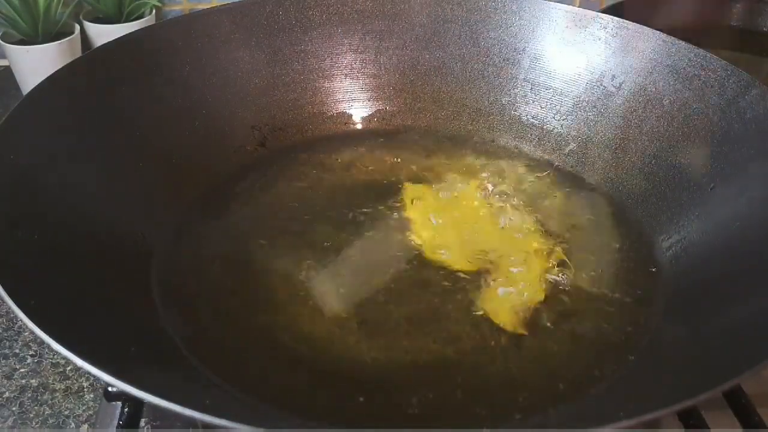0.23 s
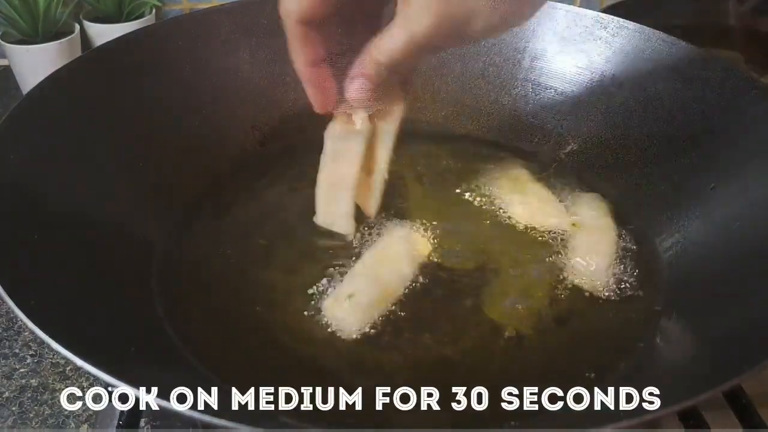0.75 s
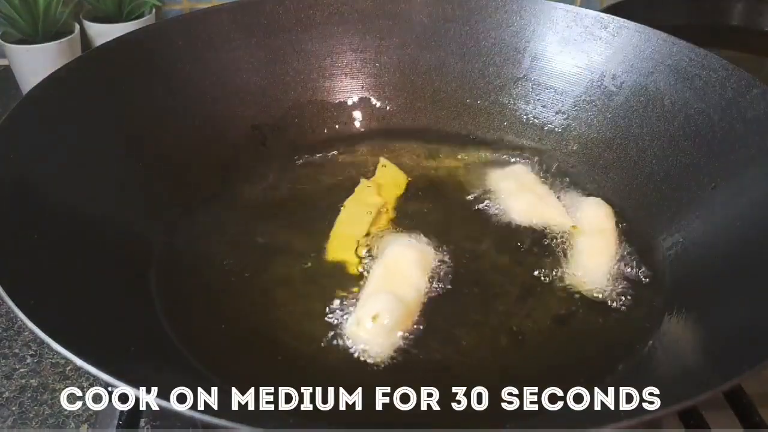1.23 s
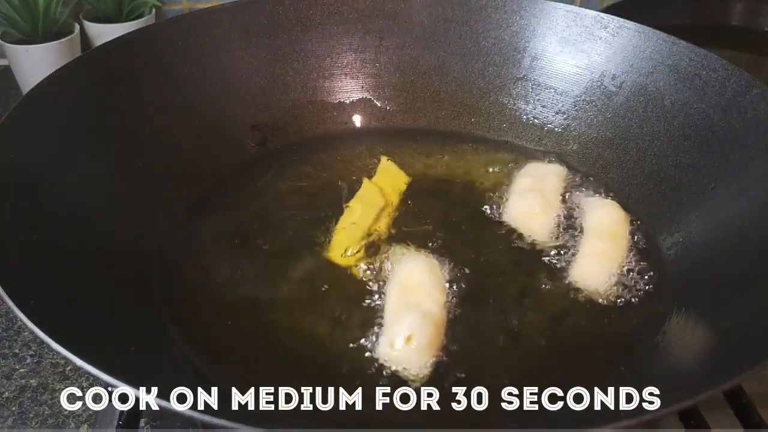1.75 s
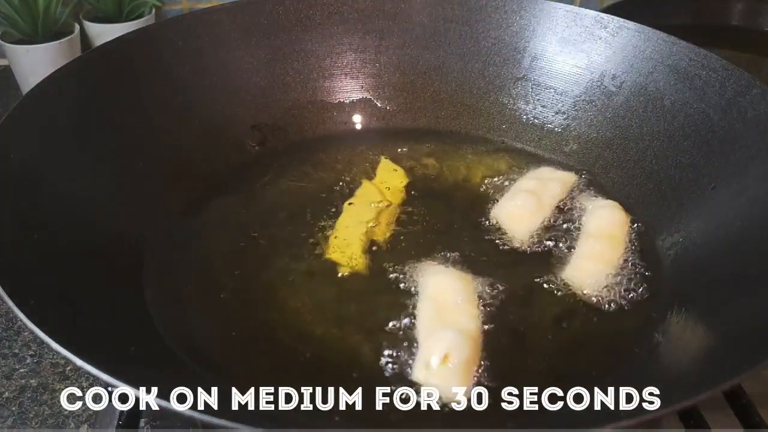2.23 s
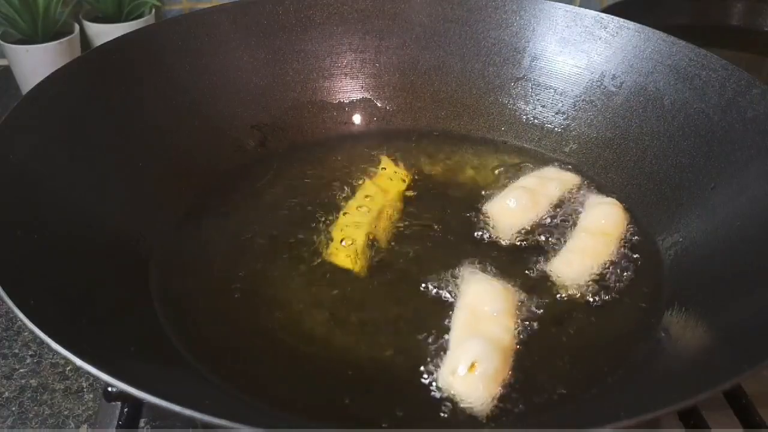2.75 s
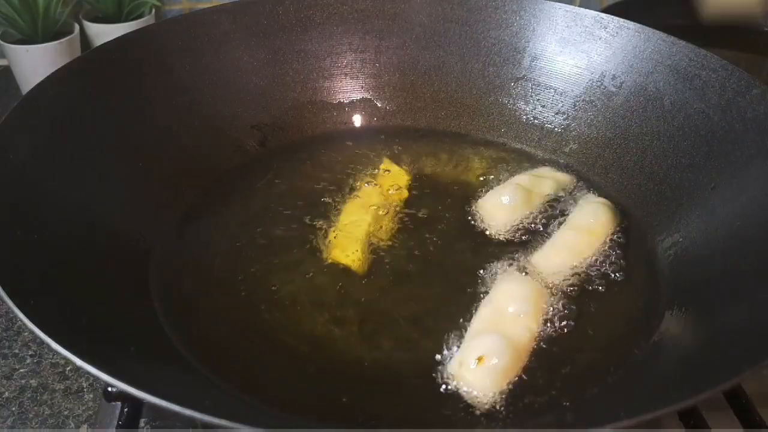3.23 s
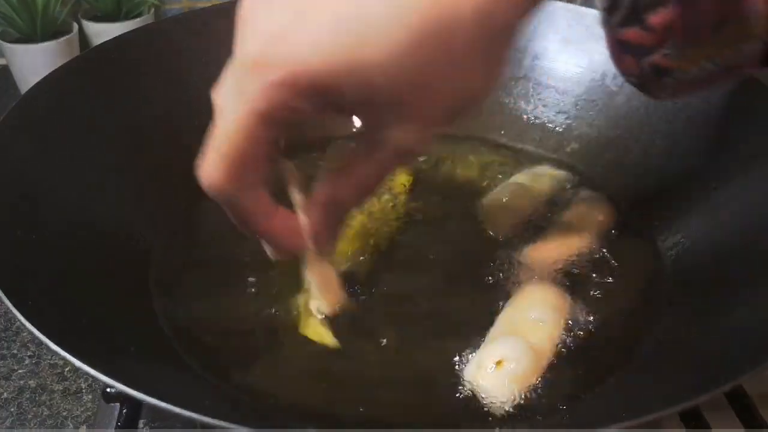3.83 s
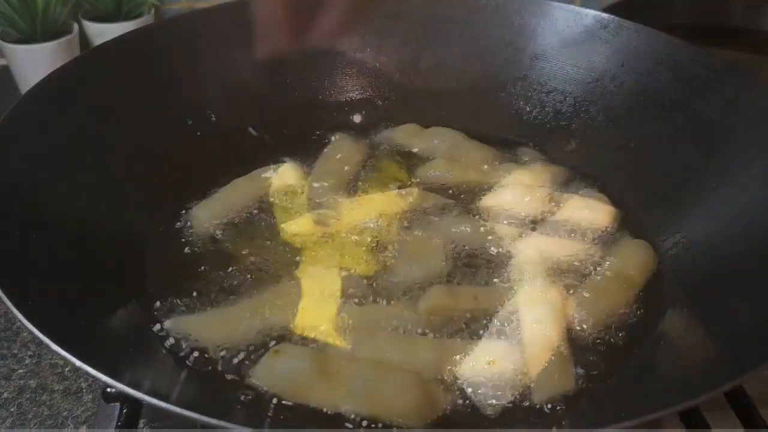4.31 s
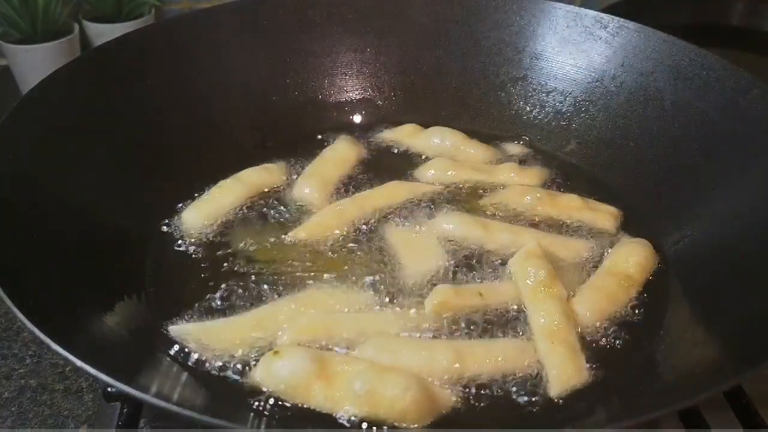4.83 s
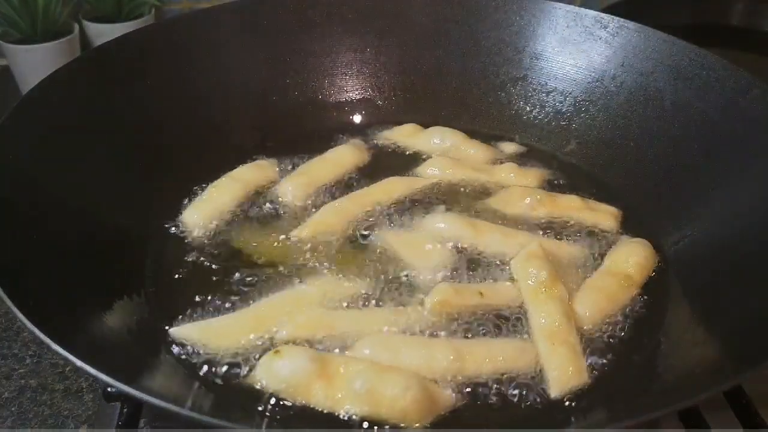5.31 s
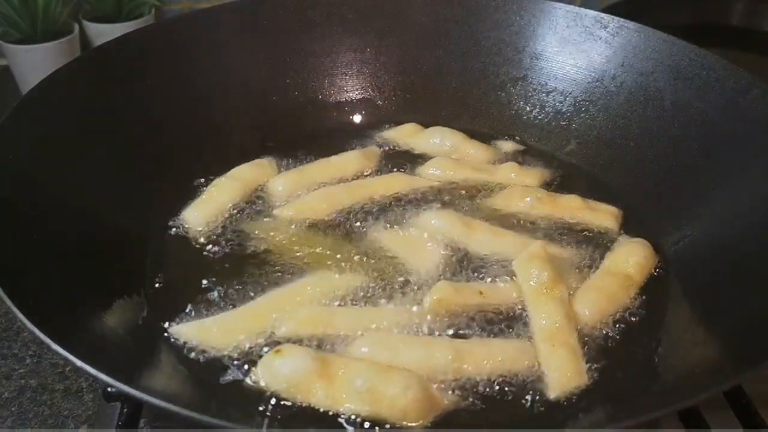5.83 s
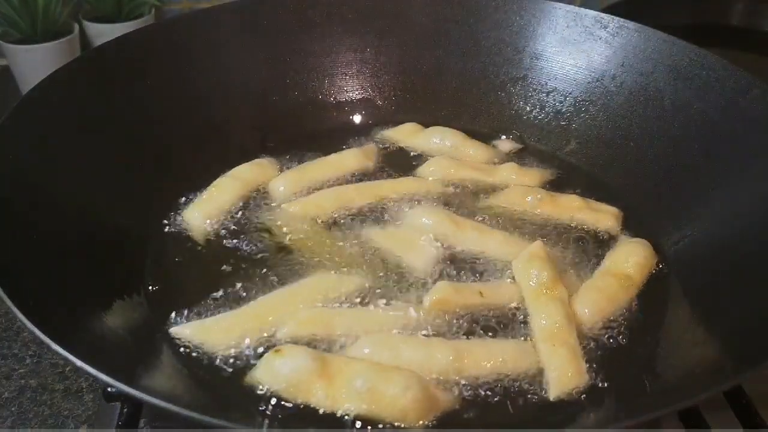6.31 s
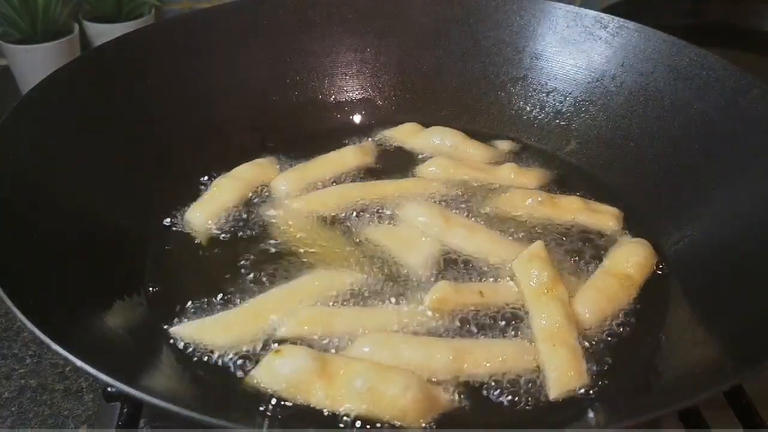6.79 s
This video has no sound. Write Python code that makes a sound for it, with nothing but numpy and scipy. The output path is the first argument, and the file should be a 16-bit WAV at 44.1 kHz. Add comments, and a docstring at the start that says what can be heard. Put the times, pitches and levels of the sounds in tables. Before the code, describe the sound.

A high, rapid twitter is already under way on the left and soon fades. A finch on the right gives two sharp metallic pink calls, then another pair later. Faint birds whistle and warble behind. On the left a singer drops through two-note steps into a rattling, slurred flourish. Echoing woodland, wide stereo, steady soft rush with an early leafy rustle.

```python
"""In an echoing wood, songbirds call over the steady rush of distant wind or water.
A finch close on the right gives sharp double 'pink' calls; on the left one bird twitters high, then another
sings a falling song with a closing flourish. Fainter birds whistle and warble among the trees.
Each voice is a frequency-modulated tone with weak harmonics, heard directly and as scatter from trunks;
the rush, the rustle and the hiss are filtered noise."""
import sys
import numpy as np
from scipy import signal
from scipy.fft import rfft, irfft, next_fast_len
from scipy.io import wavfile
from scipy.ndimage import uniform_filter1d, map_coordinates

SR = 44100
rng = np.random.default_rng(int(sys.argv[2]) if len(sys.argv) > 2 else 0)


def bounce(signal):
    """Save signal as a 16-bit WAV file at the path given by the first command-line argument."""
    frames = np.transpose(np.atleast_2d(signal))
    limited = np.clip(frames, -1, 1)
    pcm = np.round(limited * 32767).astype(np.int16)
    wavfile.write(sys.argv[1], SR, pcm)


N = 311346  # length in samples


def finch():
    """Two-voiced phonation: each call sweeps up harshly, with sidebands, into a loud pure top."""
    # Each row: top of the upsweep in seconds, top pitch in Hz, relative level in dB, hold of the top in
    # seconds, sag at the end as a share of pitch.
    calls = [(1.329, 4280, -20, 0.037, 0.0077), (1.549, 4400, -20, 0.025, 0.0096),
             (2.902, 4174, -22, 0.043, 0.024), (3.156, 4313, -20.5, .038, 0.086),
             (7.072, 4200, -26, 0.03, .02)]
    # The upsweep. Each row: time from the top in seconds, pitch ratio, relative level in dB.
    upsweep_shape = [(-.034, .54, -32), (-.02, .71, -19), (-.008, .83, -14), (0, .97, -2), (.006, .995, 1),
                     (.016, 1, 0)]
    # The other side of the syrinx, briefly above the upsweep. Each row: time from the top in seconds,
    # pitch ratio, relative level in dB.
    second_voice = [(-.044, 0.78, -30), (-.033, .84, -24.5), (-.023, .95, -27), (-.016, 1.06, -20.5)]
    release_s = 0.0074
    track = np.zeros(N)
    for s, hz, db, hold, sag in calls:
        upsweep = [(s + dt, hz * ratio, db + level) for dt, ratio, level in upsweep_shape]
        end_hz = hz * (1 - sag)
        top = [(s + .7 * hold, hz * (1 - sag / 4), db - 1),
               (s + hold, end_hz, db - 2),
               (s + hold + release_s, end_hz, db - 13)]
        add(track, *syrinx(upsweep + top, waver=0.0038, overtone_db=-8))
        # the two sides of the syrinx beat, throwing sidebands above the second voice
        for sideband, side_db in [(1, 6.5), (1.27, 2.5), (1.56, -5)]:
            edge = [(s + dt, hz * ratio * sideband, db + level + side_db) for dt, ratio, level in second_voice]
            add(track, *syrinx(edge, waver=0.046))
    reflections = near_trunks(track, db=-13.5, spread=0.064) * amp([[-5], [0]])
    return reflections + outdoors(track, direct_db=-7.0, pan_db=-16.5,
                                  echo_db=-12.0, echo_pan_db=-1.0, build=0.014)


def twitterer():
    """Directivity: as the bird turns its head the straight sound jumps in level; the wood fills evenly."""
    # How squarely the bird faces the listener. Each row: time in seconds, gain of the straight sound in dB
    # before panning.
    facing_curve = [(-.1, -37.5), (.07, -39.5), (.14, -41), (.23, -48), (.38, -51), (.46, -44.5),
                    (.54, -45.5), (.72, -56)]
    start_s, gap_s, drag_s, count = -.166, .0772, .045, 14  # the pace drags towards the end of the run
    base_hz, climb_hz_per_s, plunge_db = 6290, 860, -7
    lead_s = .25  # room for the part of the run that is under way before the scene opens
    k = np.arange(count)
    times = start_s + gap_s * k + drag_s * (k / k[-1]) ** 4
    crests = (base_hz + climb_hz_per_s * times) * (1 + .015 * rng.standard_normal(len(k)))
    syllables = np.array([twitter_syllable(s + lead_s, hz, plunge_db) for s, hz in zip(times, crests)])
    facing = amp(np.interp(times, *np.transpose(facing_curve)))
    straight = (facing @ syllables) * amp([[5], [-7]])
    # the foliage swallows the highest pitches
    scattered = filtered(syllables.sum(0), lambda hz: amp(along([(4700, -0.3), (6500, -5)], hz)))
    echo = wood_echo(scattered, build=0.0076) * amp([[-36], [-39]])
    # take the lead off the front and silence what wraps round to the end
    return np.roll(straight + echo, -round(lead_s * SR), axis=1) * (np.arange(N) < N - lead_s * SR)


def twitter_syllable(s, hz, plunge_db):
    """Superposed frequency sweeps: a zigzag, a lower pip under its crest and a plunge at its end."""
    # Each row: time from the crest in seconds, pitch ratio, level in dB before the paths to the listener.
    zigzag_shape = [(-.018, .87, -9), (-.01, .92, -2), (-.004, .96, -1), (0, 1, -3), (.005, .82, -2),
                    (.009, .88, -2), (.014, .68, -7)]
    zigzag = [(s + dt, hz * ratio, level) for dt, ratio, level in zigzag_shape]
    pip = [(s - .006, 4300, -6), (s, 4800, -1), (s + .005, 4450, -5)]
    plunge = [(s + .011, 5200, plunge_db), (s + .017, 3100, plunge_db - 6), (s + .026, 1800, plunge_db - 12)]
    track = np.zeros(N)
    add(track, *syrinx(zigzag, waver=.017))
    add(track, *syrinx(pip, waver=.04))
    add(track, *syrinx(plunge, waver=.012))
    return track


def singer():
    """Direct sound, early reflections and reverberation carry a stepwise falling song and its flourish."""
    track = steps() + flourish()
    reflections = near_trunks(track, db=-7, spread=0.08) * amp([[2], [-6]])
    return reflections + outdoors(track, direct_db=-12.5, pan_db=22.5,
                                  echo_db=-2, echo_pan_db=1.5, build=0.014)


def steps():
    """A fixed frequency ratio: each held upper note leaps down by one interval; buzzes lead in."""
    # The two-note syllables. Each row: time of the drop in seconds, upper pitch in Hz, relative level in
    # dB, hold of each note in seconds.
    leaps = [(4.104, 5450, -46, 0.031), (4.300, 4842, -43.5, 0.035), (4.495, 4840, -41, 0.033),
             (4.684, 4546, -37, 0.031), (4.871, 4063, -35.5, 0.017), (5.042, 3830, -37, 0.018)]
    # Buzzes ahead of syllables and of the closing cascade. Each row: start in seconds, length in seconds,
    # centre pitch in Hz, relative level in dB.
    buzzes = [(3.972, 0.04, 5520, -60), (4.23, .06, 6060, -62), (4.416, .045, 6170, -57.5),
              (4.615, 0.037, 5690, -53.5), (4.793, 0.078, 4870, -46), (5.699, 0.068, 5830, -55.5)]
    step_ratio = .742  # lower note over upper note
    track = np.zeros(N)
    for row in buzzes:
        add(track, *glide(*row, fall=0, waver=.06))
    for s, upper, db, hold in leaps:
        lower = upper * step_ratio
        upper_db, lower_db = db + throat(upper), db + throat(lower)
        high = [(s - hold - .006, upper * .94, upper_db - 5),
                (s - hold, upper, upper_db),
                (s, upper * .99, upper_db - 4)]
        # the voice thins as it leaps down
        drop = [(s + .009, (upper + lower) / 2 * .95, lower_db - 6)]
        low = [(s + .018, lower * .88, lower_db - 5),
               (s + .027, lower, lower_db),
               (s + .027 + hold, lower * .995, lower_db - 4)]
        add(track, *syrinx(high + drop + low, waver=.017))
    return track


def flourish():
    """Rapid repetition: rattles of falling strokes among rising slurs, then a cascade of rattles."""
    # Runs of quick strokes. Each row: start in seconds, nominal length in seconds, first and last pitch in
    # Hz before scatter, relative level in dB.
    rattles = [(5.043, .06, 3180, 2787, -37), (5.139, .03, 3810, 2920, -42),
               (5.312, .045, 4910, 3230, -34.5), (5.487, .045, 4910, 3210, -36.5),
               (5.765, .03, 4620, 4370, -40.5), (5.797, .06, 4180, 3380, -36.5),
               (5.863, .045, 3500, 2734, -34), (5.916, .03, 2600, 2360, -34)]
    # Scoops up from a low note. Each row: time of the top in seconds, relative level in dB.
    slurs = [(5.226, -35.5), (5.402, -33.5), (5.585, -35)]
    # One slur. Each row: time from the top in seconds, pitch in Hz, relative level in dB.
    slur_shape = [(-.05, 2336, 0), (-.035, 2209, 0), (-.016, 2723, -4.5), (0, 3300, 0.5), (.013, 3420, -10)]
    gap_s, stroke_s, stroke_fall = .0152, 0.01584, 0.114  # slide either side of the centre, share of pitch
    swell_db = 5  # depth of the swell towards the middle of a rattle
    scatter, scatter_db = 0.0286, 1.5  # chance from stroke to stroke: share of pitch, level
    track = np.zeros(N)
    for s, length, first, last, db in rattles:
        count = max(2, round(length / gap_s))
        chance = rng.standard_normal((count, 2))
        pitches = np.linspace(first, last, count) * (1 + scatter * chance[:, 0])
        for k, hz in enumerate(pitches):
            swell = swell_db * (np.sin(np.pi * (k + .5) / count) - 1)
            stroke_db = db + swell + scatter_db * chance[k, 1] + throat(hz)
            add(track, *glide(s + k * gap_s, stroke_s, hz, stroke_db, stroke_fall, waver=.035))
    for s, db in slurs:
        slur = [(s + dt, hz, db + level + throat(hz)) for dt, hz, level in slur_shape]
        add(track, *syrinx(slur, waver=.05))
    return track


def throat(hz):
    """Resonance: the singer's gain in dB peaks at one pitch and falls with the squared distance in octaves."""
    best_hz, octave_loss_db = 3620, 24
    return -octave_loss_db * np.log2(hz / best_hz) ** 2


def far_birds():
    """Direct-to-reverberant ratio: distant whistles are mostly echo; a closer warble is blurred by trunks."""
    # Thin whistles. Each row: start in seconds, length in seconds, pitch in Hz, relative level in dB.
    whistle_notes = [(1.775, 0.069, 5280, -57), (2.464, .17, 4540, -55), (2.529, 0.034, 4240, -49.5),
                     (2.624, 0.12, 3805, -54.5), (2.747, 0.062, 4280, -53), (3.477, 0.15, 4430, -58.5),
                     (6.279, 0.16, 4327, -59), (6.551, .4, 4396, -64.5)]
    # Soft, low slurred notes and chips. Each row: start in seconds, length in seconds, middle pitch in Hz,
    # relative level in dB, slide either side of the middle as a share of pitch (positive falls).
    warble_notes = [(.825, 0.028, 1253, -45.5, 0.082), (.905, 0.088, 2510, -47.5, -0.048),
                    (1.02, 0.044, 2795, -48, .15), (1.10, .08, 2580, -50.5, 0.086),
                    (1.712, 0.053, 2520, -49, -0.047), (1.905, 0.047, 2520, -50.5, -.01),
                    (2.078, 0.023, 2420, -49.5, 0.14), (2.135, 0.037, 3270, -59, .13),
                    (2.208, 0.026, 2150, -50.5, 0.14), (2.435, 0.027, 2210, -51, 0.11),
                    (2.582, 0.021, 2284, -47.5, 0.15), (2.735, 0.019, 2090, -51, 0.13)]
    scoop, droop = .025, 0.0062  # shares of pitch
    tones, notes = np.zeros((2, N))
    for s, length, hz, db in whistle_notes:
        arch = [(s, hz * (1 - scoop), db - 5),
                (s + length / 2, hz, db),
                (s + length, hz * (1 - droop), db - 6)]
        add(tones, *syrinx(arch, waver=.01))
    for row in warble_notes:
        add(notes, *glide(*row, waver=.045))
    whistles = outdoors(tones, direct_db=-3, pan_db=10.5, echo_db=3.5, echo_pan_db=1.5, build=0.007)
    reflections = near_trunks(notes, db=-10, spread=0.018)
    warble = outdoors(notes, direct_db=2.0, pan_db=-6, echo_db=-1.0, echo_pan_db=-4, build=0.017)
    return whistles + reflections + warble


def syrinx(contour, waver, overtone_db=-60):
    """Frequency modulation: a near-pure tone along (s, Hz, dB) points; returns its start and its sound."""
    s, hz, db = np.transpose(contour)
    t = np.arange(s[0], max(s[-1], s[0] + .004), 1 / SR)
    unsteady = wobble(450, size=SR // 2)[:len(t)]
    pitch = uniform_filter1d(np.interp(t, s, hz), size=90) * (1 + waver * unsteady)
    phase = 2 * np.pi * np.cumsum(pitch) / SR
    # the throat lets the second harmonic out mainly while the pitch is low
    second_db = overtone_db + np.interp(pitch, [3100, 3800], [0, -42])
    second = amp(second_db) * np.sin(2 * phase)
    third = amp(overtone_db - 45) * np.sin(3 * phase)
    fade = signal.windows.tukey(len(t), min(1, 160 / len(t)))
    return s[0], np.sqrt(2) * fade * amp(np.interp(t, s, db)) * (np.sin(phase) + second + third)


def glide(s, length, hz, db, fall, waver):
    """Linear pitch glide: a note swells and fades while it slides through hz, down if fall is positive."""
    contour = [(s, hz * (1 + fall), db - 5),
               (s + length / 2, hz, db),
               (s + length, hz * (1 - fall), db - 6)]
    return syrinx(contour, waver)


def outdoors(x, direct_db, pan_db, echo_db, echo_pan_db, build):
    """Superposition: the straight path plus the wood's echo, each panned (positive dB is left)."""
    sides = np.array([[.5], [-.5]])
    direct = x * amp(direct_db + pan_db * sides)
    return direct + wood_echo(x, build) * amp(echo_db + echo_pan_db * sides)


def near_trunks(x, db, spread):
    """Early reflection: distinct returns from the closest trees differ by side and weaken with delay."""
    out = np.zeros((2, N))
    for side in out:
        for late, size in rng.random((8, 2)):
            add(side, .012 + spread * late, x * amp(db - 5 * size - 4 * late))
    return out


def wood_echo(x, build):
    """Diffuse reverberation: scatter from countless trunks builds up, then decays faster at high pitch."""
    # Each row: frequency in Hz, time to decay by 60 dB in seconds.
    decay = [(1000, 2.4), (4000, 1.34), (7000, 0.65)]
    hz, t, z = signal.stft(rng.standard_normal((2, 3 * SR // 2)), SR, nperseg=256)
    envelope = amp(-60 * t / along(decay, hz)[:, None]) * (1 - np.exp(-t / build))
    tail = signal.istft(z * envelope, SR, nperseg=256)[1]
    return signal.fftconvolve(x[None], tail / np.linalg.norm(tail[0]), axes=1)[:, :N]


def background():
    """Filtered noise: a soft central rush, a wider rustle that ebbs away, and faint high hiss."""
    # Levels of the rush, the leaves and the hiss. Each row: time in seconds, relative level in dB.
    rush_level, leaf_level, air_level = [(0.2, -47), (4.84, -51), (6.79, -51), (6.9, -51.5)], [(0, -58.5), (1.05, -46.5), (1.8, -48.5),
                                                       (2.7, -56.5), (3.3, -54), (4.4, -64.5)], [(0.0, -76), (1.29, -79),
                                                                       (1.46, -74.5), (1.96, -80),
                                                                       (5.34, -80.5), (6.9, -79.5)]
    # Their spectra. Each row: frequency in Hz, relative spectral level in dB.
    rush_colour, leaf_colour, air_colour = [(20, -31.5), (70, -40), (170, -33), (300, -23), (500, -11.5),
                                            (720, -6), (980, -1), (1250, -2), (1550, -4), (2100, -9.5),
                                            (3200, -14), (4700, -21), (6800, -30), (9000, -52.5)], [(900, -38), (1800, 3), (2600, 2),
                                                                 (3400, 4), (4800, -4.5), (6500, -20),
                                                                 (7500, -50)], [(3000, -29.5),
                                                                                      (7000, -3),
                                                                                      (10000, -2.5),
                                                                                      (13000, -8.5),
                                                                                      (15700, -12)]
    # Coherence of the rush. Each row: frequency in Hz, left-right likeness from 0 to 1.
    rush_likeness = [(60, 0.94), (150, 0.71), (390, 0.75), (1010, 0.75), (2590, 0.033), (6640, 0.03)]
    rush = amp(curve(rush_level) + 0.27 * wobble(4.49, size=N)) * noise(rush_colour, rush_likeness)
    leaves = amp(curve(leaf_level) + 2.0 * wobble(15, size=N)) * noise(leaf_colour, [(2000, 0.025)])
    air = amp(curve(air_level) + 4.5) * noise(air_colour, [(8000, .05)])
    return amp(2.0) * rush + leaves + air


def noise(colour, alike):
    """Interaural coherence: independent mid and side noises set the likeness; coloured stereo of rms 1."""
    def turn(hz):
        # mid = cos and side = sin of this angle give a correlation of cos(2 * angle)
        return np.arccos(np.clip(along(alike, hz), -1, 1)) / 2

    def response(hz):
        return amp(along(colour, hz)) * [np.cos(turn(hz)), np.sin(turn(hz))]

    mid, side = filtered(rng.standard_normal((2, N)), response)
    return unit(np.array([mid + side, mid - side]))


def filtered(x, response):
    """Linear filtering: the spectrum of x times a response of frequency in Hz."""
    m = next_fast_len(N + 8192)
    return irfft(rfft(x, m) * response(np.fft.rfftfreq(m, 1 / SR)), m)[..., :N]


def wobble(rate, size):
    """Band-limited fluctuation: a smooth random curve through rate knots a second."""
    knots = rng.standard_normal(size // 40 + 8)
    return map_coordinates(knots, [np.arange(size) * rate / SR], mode='wrap')


def along(points, hz):
    """Logarithmic frequency scale: (Hz, value) points interpolated on a log axis."""
    f, v = np.transpose(points)
    return np.interp(np.log(hz + 1), np.log(f + 1), v)


def curve(rows):
    """Linear interpolation: (s, value) rows as one value per sample."""
    return np.interp(np.arange(N) / SR, *np.transpose(rows))


def add(track, s, sound):
    """Superposition: mix a sound into a track at time s, dropping what falls outside."""
    at = round(s * SR) + np.arange(len(sound))
    inside = (at >= 0) & (at < N)
    track[at[inside]] += sound[inside]


def amp(db):
    """Logarithmic level: decibels to amplitude gain."""
    return 10 ** (np.asarray(db) / 20)


def unit(x):
    """Normalisation: x scaled to rms 1."""
    return x / np.sqrt(np.mean(x ** 2) + 1e-20)


def scene():
    """Superposition: all the birds over the background."""
    return finch() + twitterer() + singer() + far_birds() + background()


def record(dry):
    """Band limitation: nothing is kept at or above 15750 Hz."""
    return filtered(dry, lambda hz: hz < 15750)


dry = scene()
out = record(dry)
bounce(out)
```